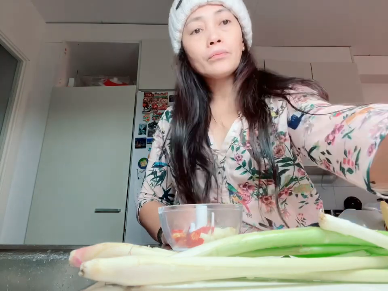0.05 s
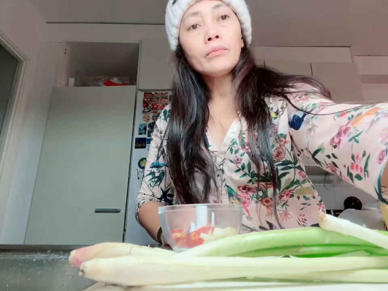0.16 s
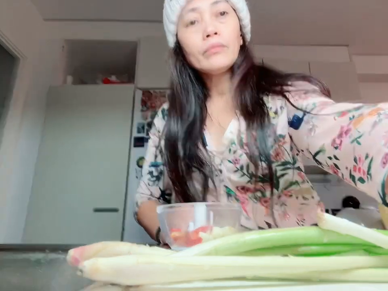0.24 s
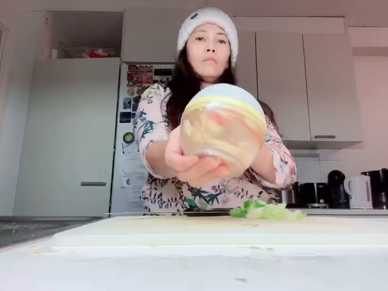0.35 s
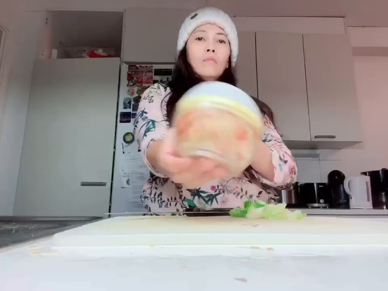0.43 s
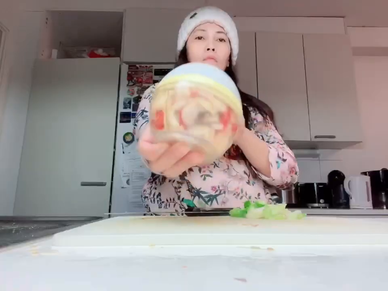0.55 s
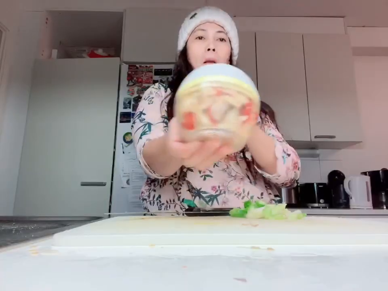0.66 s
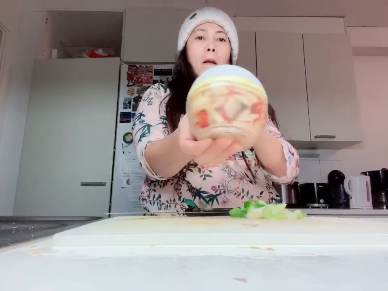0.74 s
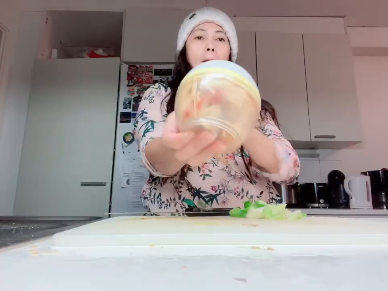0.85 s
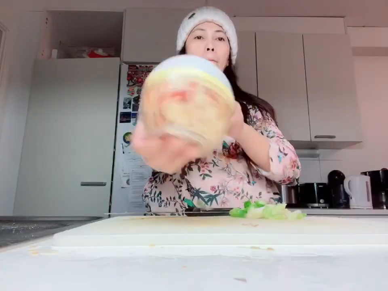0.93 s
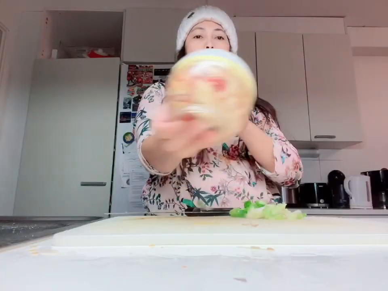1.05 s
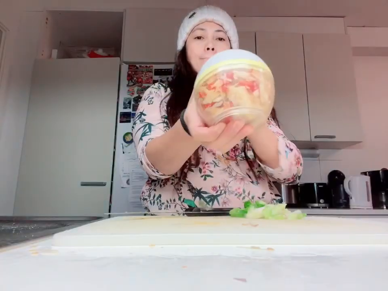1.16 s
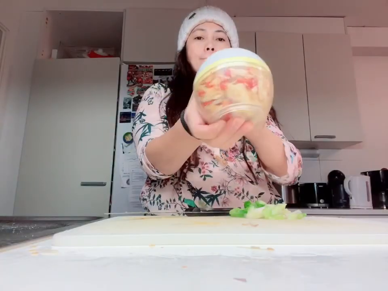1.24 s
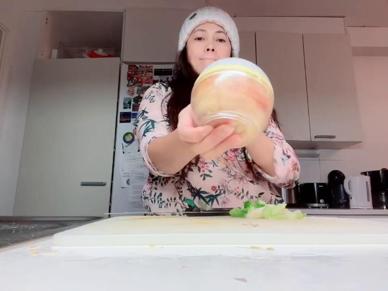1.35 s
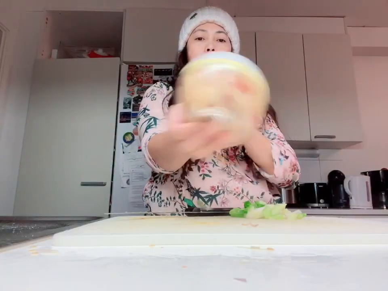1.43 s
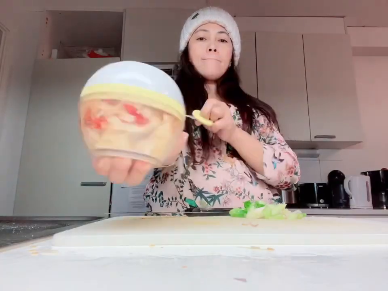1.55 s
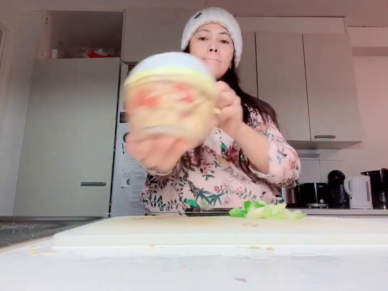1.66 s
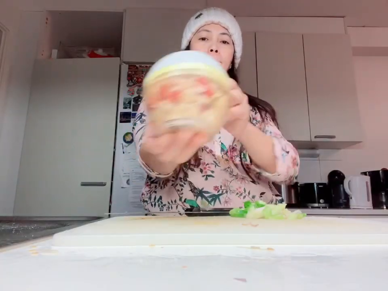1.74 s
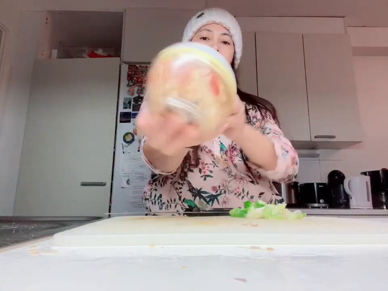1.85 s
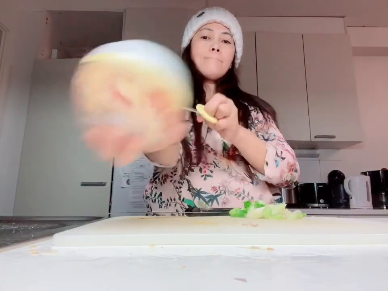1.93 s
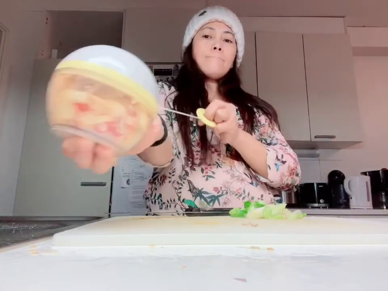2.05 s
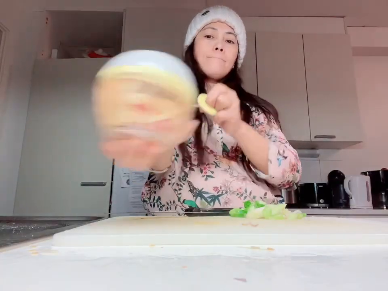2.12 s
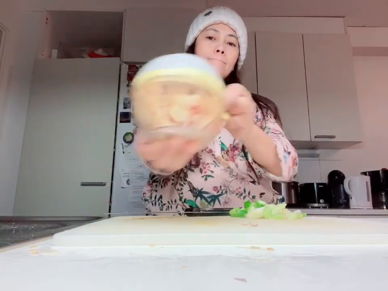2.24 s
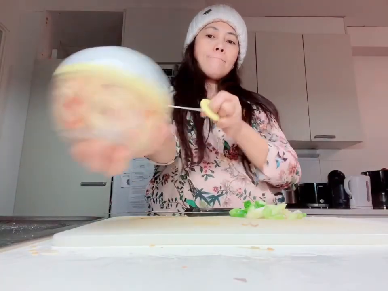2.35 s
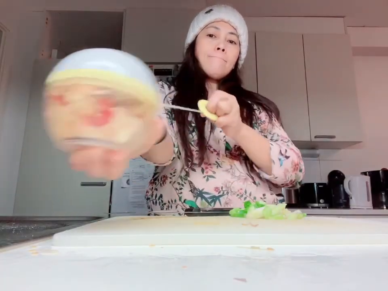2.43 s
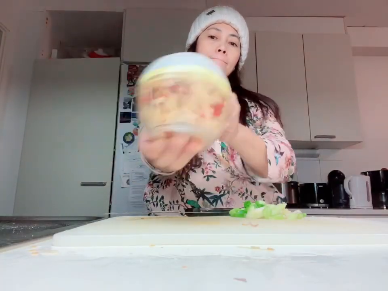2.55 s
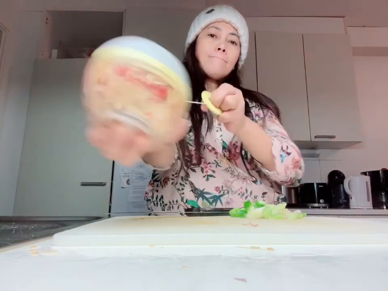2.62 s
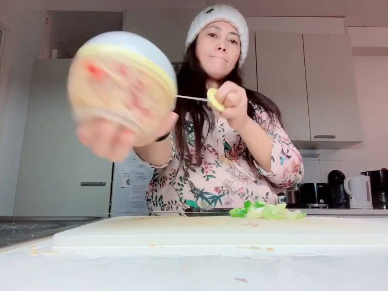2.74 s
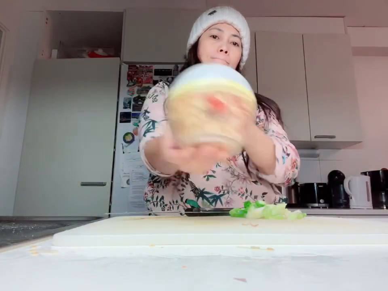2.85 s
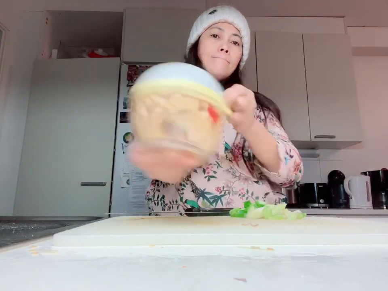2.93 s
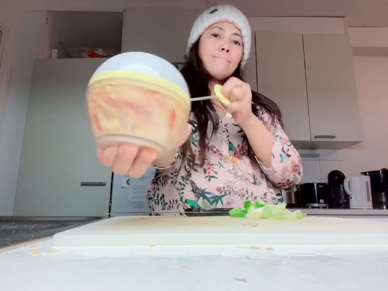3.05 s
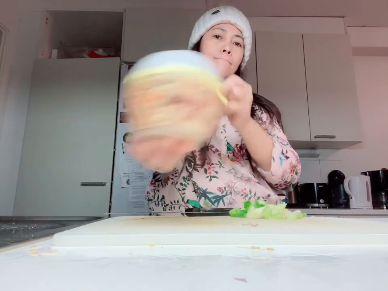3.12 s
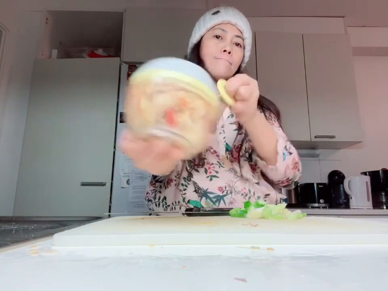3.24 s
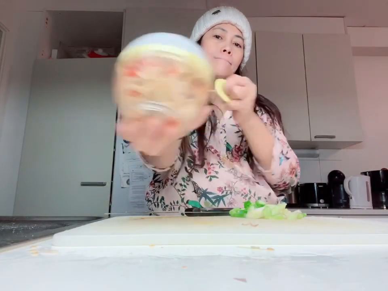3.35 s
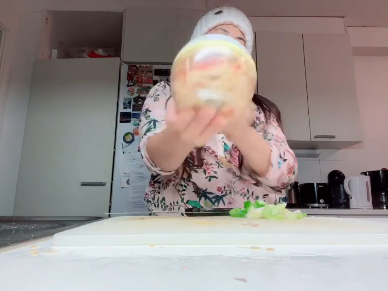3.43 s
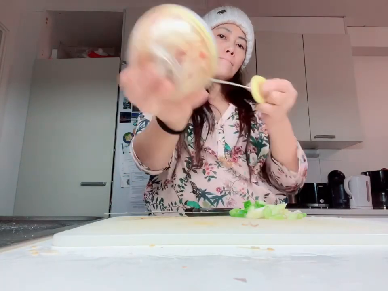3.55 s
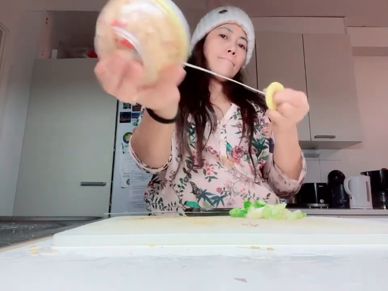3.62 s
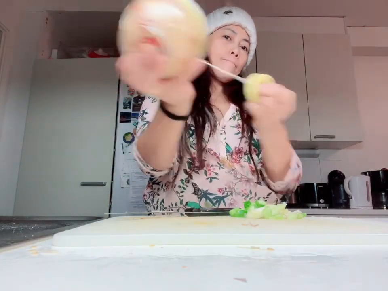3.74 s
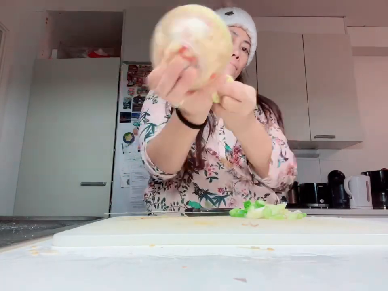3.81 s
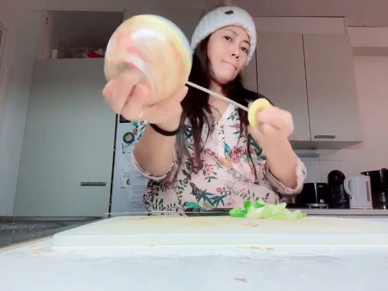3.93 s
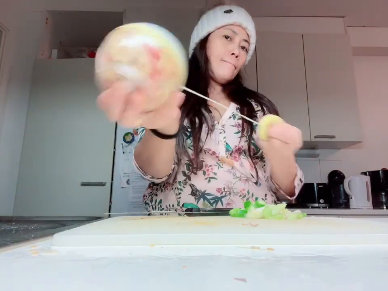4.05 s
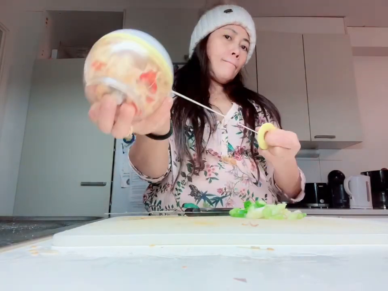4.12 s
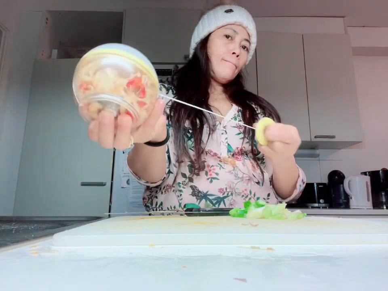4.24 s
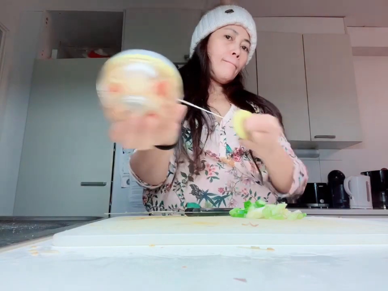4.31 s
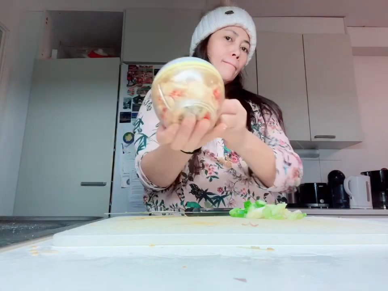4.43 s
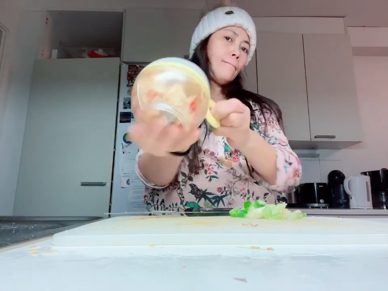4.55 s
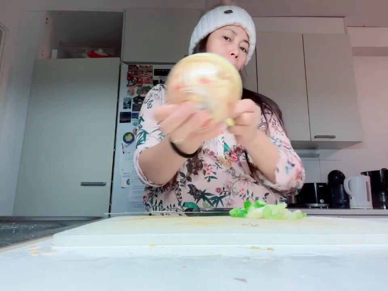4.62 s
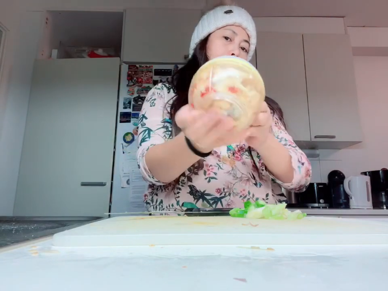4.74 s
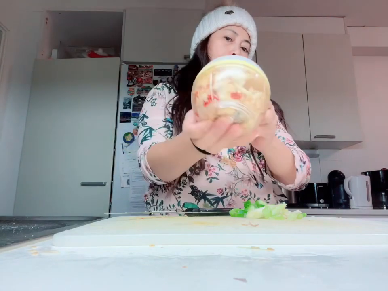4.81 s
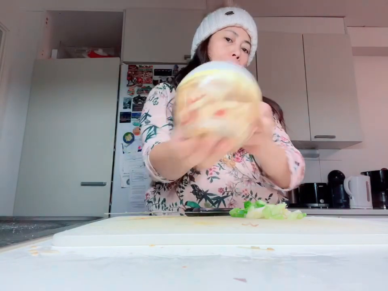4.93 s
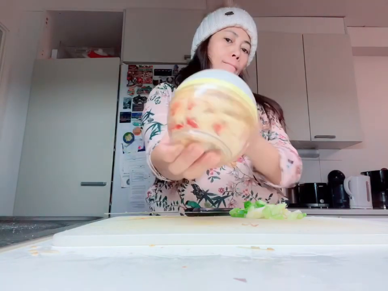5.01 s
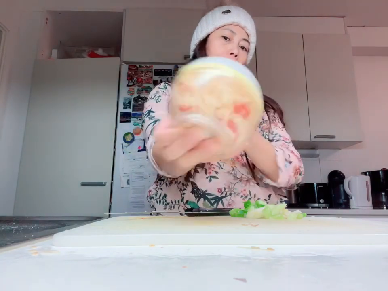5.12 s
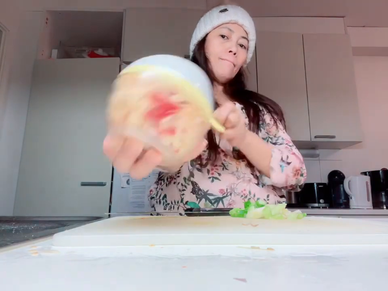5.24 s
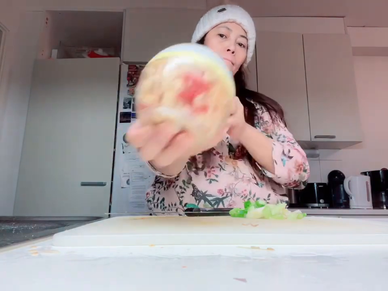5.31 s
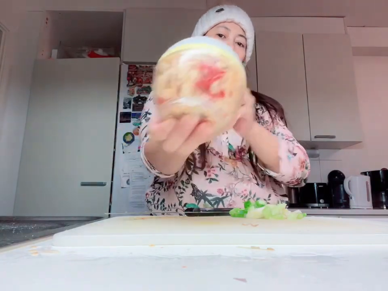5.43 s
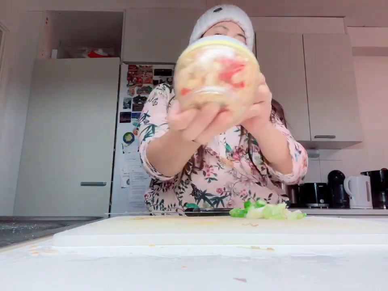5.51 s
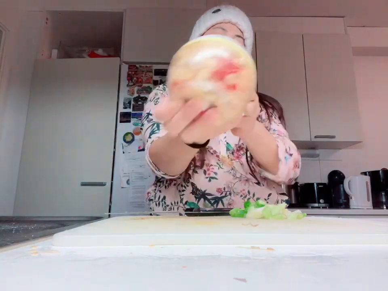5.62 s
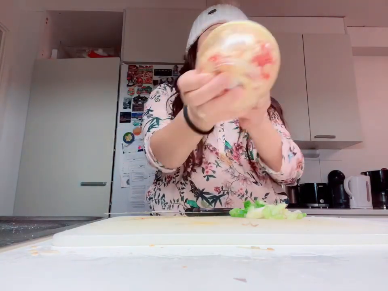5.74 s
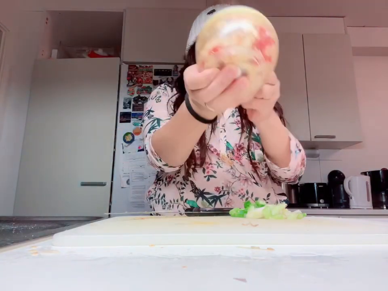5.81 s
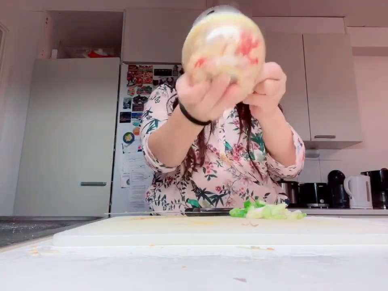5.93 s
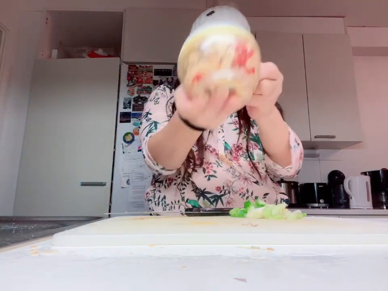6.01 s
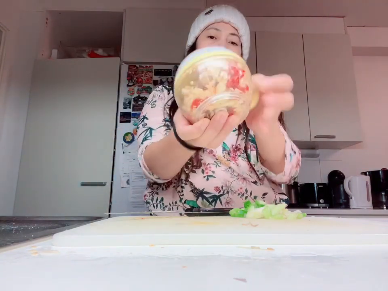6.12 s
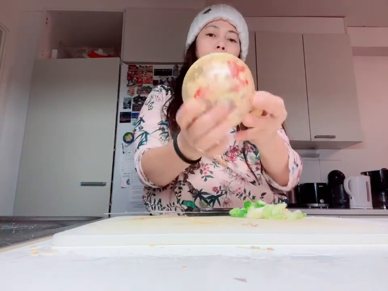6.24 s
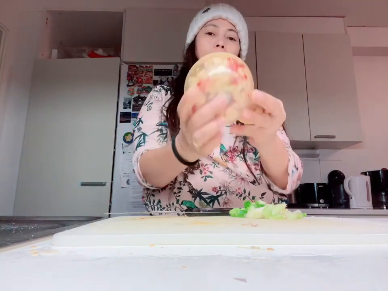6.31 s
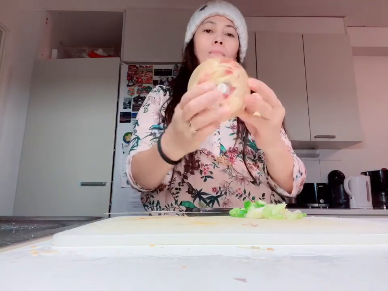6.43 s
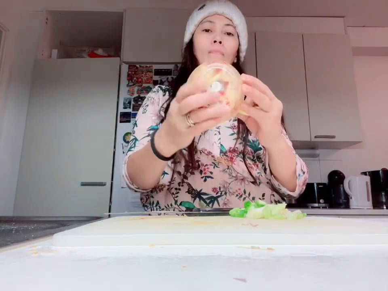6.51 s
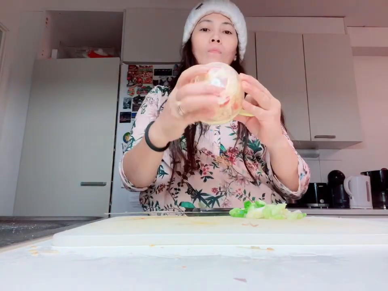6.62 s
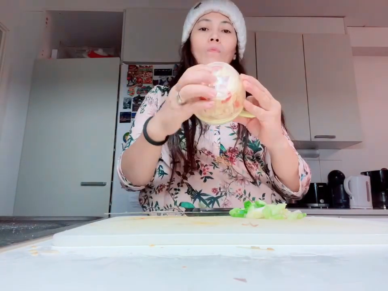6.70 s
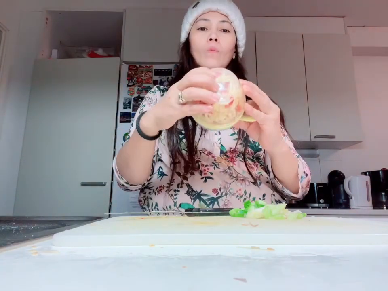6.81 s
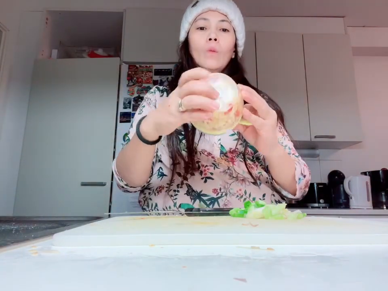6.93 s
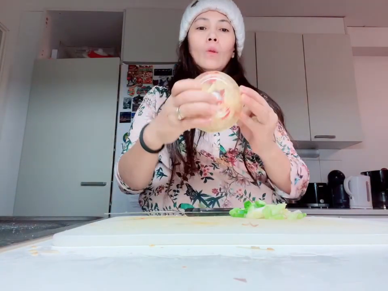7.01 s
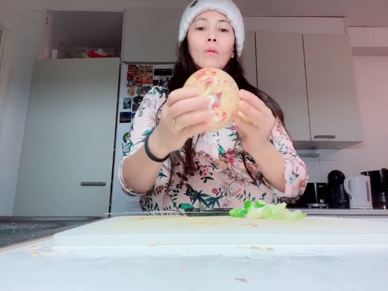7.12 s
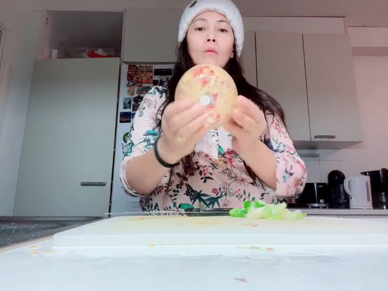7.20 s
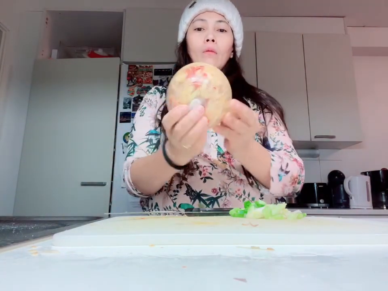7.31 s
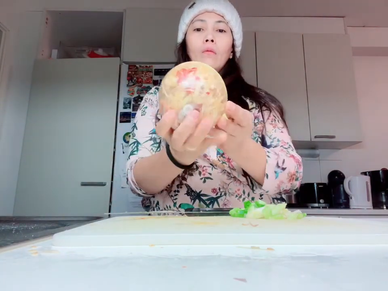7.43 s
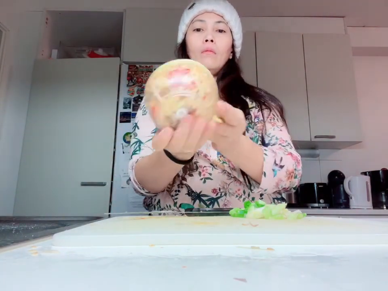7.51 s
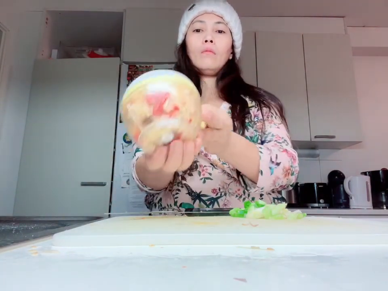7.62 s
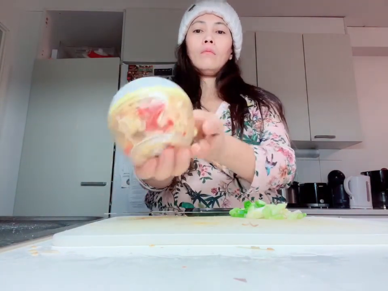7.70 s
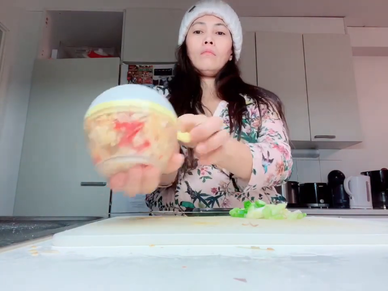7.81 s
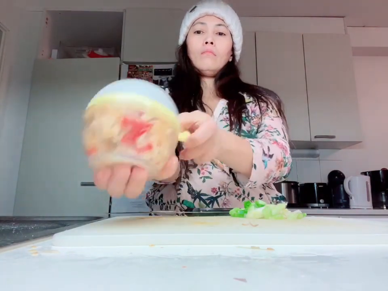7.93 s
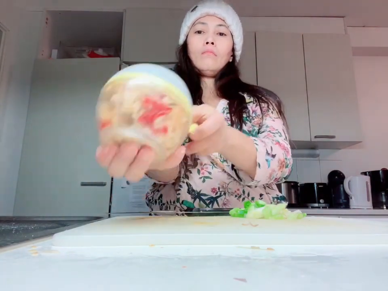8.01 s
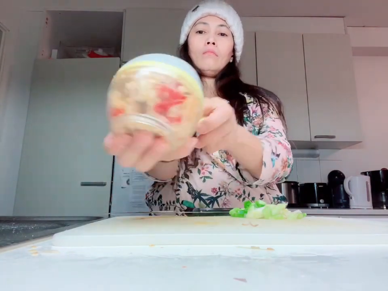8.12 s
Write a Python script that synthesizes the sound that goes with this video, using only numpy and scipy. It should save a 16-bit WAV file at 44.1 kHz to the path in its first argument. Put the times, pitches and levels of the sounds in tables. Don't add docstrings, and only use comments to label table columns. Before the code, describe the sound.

A hand chopper with a pull cord rattles hard and dry, close up, with short reflections from kitchen cupboards. Each pull gives a crunchy hail of pieces against plastic, then a bright zipping rewind and sharp clack. The rhythm quickens, pauses briefly near four and a half seconds, bursts again, then ceases. Quiet ratchet ticks and finger taps follow, with soft room noise and low hum.

```python
import sys
import numpy as np
from scipy import signal
from scipy.fft import rfft, irfft
from scipy.io import wavfile

SR = 44100
rng = np.random.default_rng(int(sys.argv[2]) if len(sys.argv) > 2 else 0)


def inscribe(sig):
    pcm = np.round(np.clip(np.atleast_2d(sig).T, -1, 1) * 32767)
    wavfile.write(sys.argv[1], SR, pcm.astype(np.int16))


def volts_from_db(level):
    exponent = np.asarray(level, float) / 20
    return 10 ** exponent


N = 359856

# freq_hz, density_db
AIR_SPECTRUM = [(40, -30), (120, -20), (250, -20), (500, -23), (800, -26), (1100, -33), (2200, -37),
                (2800, -35), (3600, -42.5), (4700, -46), (5500, -44), (8000, -47), (15500, -55.5)]
# freq_hz, rms_db
MOTOR_LINES = [(49, -66), (100, -51), (184, -70.5)]
# freq_hz, rms_db
PUMP_LINES = [(2175, -83), (2573, -76), (2622, -77), (2772, -85), (2918, -82), (2966, -81), (3117, -85),
              (4204, -92), (6035, -89.5)]
# time_s, gain_db
HUM_GAIN = [
    (.33, 0.5),
    (.4, -14),
    (.75, -10),
    (1.0, -4.5),
    (5.9, -0.5),
]
# start_s, end_s
GAP_S = (.3335, .3555)
# time_s, peak_db
JOLTS = [(0, -45), (.32, -41), (.79, -53), (1.42, -36), (1.82, -38), (2.2, -42), (2.6, -41), (2.9, -38),
         (2.42, -42.5), (3.2, -40.5), (3.45, -51), (3.87, -46), (5.07, -33), (4.75, -49), (5.55, -38.5),
         (5.87, -46), (6.09, -43)]
# freq_hz, width_hz, gain_db
THUD_MODES = [(134, 110, -3.5), (192, 95, 0.5), (269, 63, 4.5), (320, 100, -1.5)]
# freq_hz, width_hz, gain_db
BELLY_MODES = [(442, 110, -4.5), (608, 139, -0.5), (729, 161, 1.5), (869, 109.5, 2), (1221, 110, -14)]
# freq_hz, width_hz, gain_db
WALL_MODES = [(1420, 590, -4), (1768, 190, -2.5), (1976, 110, 0.5), (2480, 710, -4.5), (3040, 69, -1.5),
              (3380, 690, -11)]
# freq_hz, width_hz, gain_db
RIM_MODES = [(4330, 2600, -8.5), (6264, 900, -1.5), (6840, 1000, -4.5), (9200, 2100, -5.5),
             (11300, 5000, -10.5), (14050, 2800, -10), (14700, 820, -9)]
# freq_hz, width_hz, gain_db
LID_MODES = [(500, 700, -12.5), (883, 81, -5.5), (1720, 320, -20), (2050, 130, 0.5), (2206, 180, 1.5),
             (2600, 200, -7), (2890, 88, -8), (3490, 3200, -15.5)]
# freq_hz, width_hz, gain_db
SPRING_MODES = [(5310, 380, -2), (6650, 1900, -12), (8170, 430, 0.5), (9100, 1900, -7), (9600, 270, -0.5),
                (11940, 1000, -10.5), (13000, 600, -20), (15300, 1300, -12)]
# start_s, peak_db, rise_s, length_s, entry_rel_db
REWINDS = [(.549, -35, 0.048, 0.15, -5.5), (1, -33, 0.051, 0.15, -5.5), (1.524, -25.5, 0.066, 0.18, -8),
           (1.988, -24.5, 0.046, 0.14, -4.5), (2.354, -23.5, 0.037, 0.13, -8),
           (2.681, -20.5, 0.048, 0.11, -10.5), (2.979, -18, 0.044, 0.1, -8.5),
           (3.262, -21.5, 0.0492, 0.11, -15.5), (3.634, -24, 0.045, 0.13, -8),
           (4.204, -28, 0.061, 0.23, -9.5), (5.315, -27, 0.021, 0.19, -5.5)]
# time_s, peak_db, brightness_db
TICKS = [(0.526, -32, -6), (.985, -30, -10), (1.256, -34, 10), (6.18, -51.5, -2.5), (7.57, -49, -6),
         (3.9504, -21, -0.5), (3.966, -11.5, -8), (4.1715, -28, -6.5), (4.1936, -26.5, -12),
         (4.797, -20.5, -12), (5.2884, -21, -26.5), (5.9518, -46, -3.5), (6.391, -34.5, -2.5),
         (6.409, -35.5, -6), (6.4294, -45, -7), (7.024, -35.5, -4), (7.0397, -52.5, -8.5),
         (7.1403, -40.5, -12.5), (7.234, -51.5, -4), (8.143, -22.5, -4), (1.559, -14, -8.5),
         (1.582, -18, -10), (2.408, -10, -8), (2.447, -15, -8), (2.694, -16, -9), (3.006, -7, -10),
         (3.031, -6.5, -8), (3.31, -7.5, -8), (3.68, -17, -6), (4.246, -23, -1), (4.268, -26, -4),
         (5.33, -18, -13), (5.462, -32, -10), (5.476, -28, -3)]
# time_s, peak_db, pitch_hz
RINGS = [(.784, -17.5, 2140), (.806, -11.5, 2600), (1.378, -14, 1350), (1.42, -17, 1900),
         (2.218, -13.5, 4500), (2.266, -14.5, 4100), (2.269, -14, 2900), (2.516, -17, 2490),
         (2.824, -16, 1830), (2.846, -10, 1640), (2.847, -8.5, 4570), (3.116, -10.5, 3002),
         (3.133, -11, 2000), (3.161, -11, 2099), (3.381, -5, 1950), (3.497, -18, 1160), (4.439, -11, 1675),
         (4.44, -16, 2501), (4.881, -15, 2010), (5.055, -12.5, 3600), (5.068, -17, 4800),
         (5.093, -2.5, 2050), (5.106, -12, 3150), (5.263, -28, 2761), (5.487, -17, 2199),
         (5.696, -36, 2150), (5.75, -27, 2360), (5.63, -31, 840.3), (5.768, -21.5, 258),
         (5.77, -28.5, 599.7), (6.285, -39, 2190), (7.705, -34.5, 4000), (7.784, -34.5, 2700),
         (7.82, -34, 2550), (7.843, -28.5, 2320), (7.963, -25.5, 2570), (7.885, -35, 347),
         (8.029, -32, 504), (8.054, -34, 450), (8.068, -26.5, 2310), (8.079, -25, 448), (3.951, -22, 5540),
         (3.962, -20.5, 5400), (2.796, -8, 878), (7.753, -23, 740), (7.843, -25.5, 750), (7.963, -23, 864),
         (8.147, -28, 5305), (5.057, -9, 803), (5.071, -9, 700), (1.838, -16, 4000), (4.66, -31, 302),
         (4.8, -32, 3300), (0.289, -18.5, 1480), (.253, -28.5, 1600), (7.025, -46, 2300),
         (6.392, -44, 2350)]
# time_s, peak_db, brightness_db
STOPS = [(.7, -11.5, -5.5), (1.165, -16.5, -3.5), (1.706, -10, -3.5), (2.128, -5, -6.5), (2.478, -6, -4.5),
         (2.795, -0.7, -5.5), (3.083, -5.5, -6), (3.377, 0.5, -8.5), (3.808, -20, 2), (4.438, -7.5, -3),
         (5.491, -5.5, -10)]
# time_s, peak_db, thud_rel_db, brightness_db
TAPS = [(.25, -20, -9, -19), (.286, -6, -11, -23), (0.327, 0.5, -13.5, -24), (.502, -29.5, -18, -10),
        (.968, -30, -15, -3.5), (4.537, -25, -13, -17), (4.657, -22, -9, -10), (5.261, -23, -17, -11),
        (5.694, -24.5, -7.5, -7), (5.749, -14, -8.5, -14.5), (5.878, -35, -23, 1), (6.283, -20, -28, -19.5),
        (6.559, -37.5, -2.5, -20), (7.377, -25, -22.5, -4.5), (7.6, -31.5, -22, -13.5),
        (7.703, -22, -24, -5.5), (7.751, -16.5, -25.5, -9.5), (7.775, -21.5, -32, -5),
        (7.798, -28, -31, -2.5), (7.817, -21.5, -25, -14), (7.842, -21, -35, -10.5),
        (7.88, -19.5, -19, -9.5), (7.961, -11, -16, -9), (8.004, -25, -8, -5), (8.038, -23.5, -27, -9),
        (8.065, -33, -22, 0.5), (8.077, -19.5, -17, -19), (8.144, -23, -34, -9)]
# time_s, peak_db, brightness_db
CHOPS = [(.804, -3, -11), (.91, -18, -15.5), (1.194, -17.5, -12.5), (1.234, -15.5, -5), (1.279, -26, 2),
         (1.331, -4.5, -21), (1.494, -25.5, -2), (1.784, 1, -11), (1.849, -2, -15), (1.963, -24, -3),
         (2.218, 2.5, -12), (2.334, -16, -7), (2.517, -5.5, -13), (2.545, -6, -0.5), (2.822, -6, -13),
         (2.847, -14.5, -16), (3.112, -8.5, 0), (3.611, -36, 7.5), (4.075, -28.5, -2.5), (4.137, -25, -11),
         (4.743, -22.5, -9), (4.76, -22.5, -9), (4.872, -11, -20), (4.88, -5.5, -1.5), (4.95, -15, -6.5),
         (4.984, -19, -1), (5.054, 0, -10.5), (5.071, -1, -27), (5.092, -15, 4), (5.485, -15, -17),
         (.782, -8.5, -21), (1.347, -7, -12.5), (1.361, -4.5, -17), (1.379, -7, -8), (1.42, -10.5, -3.5),
         (1.748, -17, -2), (1.792, -7, -9.5), (3.43, -12, -5), (3.77, -21, -13), (3.865, -9.5, -10),
         (4.78, -27.5, -2.5), (4.828, -28, -4), (2.165, -11, -8), (2.19, -11, -9), (2.266, -2.5, -8),
         (2.836, -3.5, -12), (2.864, -6.5, -7.5), (3.132, -5, -8.5), (3.161, -8, -5.5), (3.497, -10.5, -8),
         (5.086, -1.5, -15.5), (5.106, -5, -10), (5.135, -14.5, -4.5)]
# start_s, peak_s, end_s, peak_db, brightness_db
SHIFTS = [(0.07, 0.088, 0.13, -52, -12), (0.113, 0.133, 0.21, -47.5, -13), (0.222, 0.247, 0.29, -28, -26),
          (0.273, 0.288, 0.336, -19.5, -25), (0.312, 0.327, 0.354, -19, -27),
          (4.638, 4.672, 4.8, -35.5, -12.5), (5.621, 5.627, 5.69, -41, -9),
          (5.698, 5.765, 5.93, -41.5, -6.5), (5.79, 5.846, 6.1, -51.5, -7), (3.148, 3.205, 3.34, -42, -17),
          (5.529, 5.547, 4.73, -39, 0), (5.98, 6.035, 6.31, -53, -6), (6.098, 6.138, 6.3, -52, -4.5),
          (7.755, 7.764, 8.0, -52.5, 5), (7.967, 8.08, 8.2, -51.5, 1), (8.117, 8.14, 8.2, -49.5, 0)]
# start_s, peak_s, end_s, peak_db, entry_rel_db
SURGES = [(0.354, 0.39, 0.58, -36, -1.5), (0.728, 0.78, 0.95, -24, -20.5), (1.217, 1.31, 1.6, -29, -7.5),
          (1.333, 1.365, 1.493, -15.5, -6), (1.477, 1.54, 2.2, -43.5, 4), (1.722, 1.827, 1.965, -16.5, -17),
          (1.91, 1.958, 2.4, -40, -2), (2.143, 2.243, 2.354, -20, -3), (2.495, 2.545, 2.733, -18.5, -9),
          (2.809, 2.845, 3.04, -15, -13), (3.092, 3.154, 3.223, -16, -12), (3.392, 3.475, 3.655, -28, 4),
          (3.58, 3.1, 4.8, -46, -13), (3.758, 3.856, 4.03, -23, -21.5), (3.918, 3.96, 4.053, -23, -7.5),
          (4.06, 4.4, 4.3, -48.5, -1.5), (4.448, 4.441, 4.612, -32, 16), (4.743, 4.798, 4.94, -40, -9),
          (4.894, 5.01, 4.95, -33.5, 0), (4.92, 5.17, 5.06, -29.5, -7.5), (5.02, 5.03, 5.2, -18, -15),
          (5.077, 4.83, 5.05, -15.5, -10), (5.112, 5.1, 5.03, -28, -1), (5.16, 5.3, 5.97, -46.5, 8),
          (5.5, 5.57, 5.66, -35.5, -3), (1.171, 1.13, 1.2, -42.5, 2), (3.171, 3.21, 3.5, -45, 1),
          (2.881, 2.911, 3.01, -23.5, -3), (4.815, 4.828, 4.8, -44.5, -2)]


def cut(x, hz, kind):
    return signal.sosfilt(signal.butter(2, hz, kind, fs=SR, output="sos"), x)


def drift(rate_hz):
    r = np.exp(-64 * np.pi * rate_hz / SR)
    draws = rng.standard_normal(N // 32 + 1002)
    slow = signal.lfilter([1], [1, -2 * r, r * r], draws)[1000:]
    return np.interp(np.arange(N) / 32, np.arange(len(slow)), slow / slow.std())


def grains(per_s, spread_db, smooth):
    sizes = volts_from_db(spread_db * np.minimum(rng.exponential(1, N), 4)) * rng.choice([-1, 1], N)
    clicks = sizes * (rng.random(N) < per_s / SR)
    friction = rng.standard_normal(N)
    return np.sqrt(1 - smooth) * clicks / clicks.std() + np.sqrt(smooth) * friction


def resonate(x, modes, wander_db=0, wander_hz=6.3):
    out, pulse = 0, 0
    for k, (hz, width_hz, db) in enumerate(modes):
        r = np.exp(-np.pi * width_hz / SR)
        top = (-1) ** k * volts_from_db(db) * (1 - r * r) / 2
        b = [top, 0, -top]
        a = [1, -2 * r * np.cos(2 * np.pi * hz / SR), r * r]
        out = out + signal.lfilter(b, a, x + 1e-18) * volts_from_db(wander_db * drift(wander_hz))
        pulse = pulse + signal.lfilter(b, a, signal.unit_impulse(4096))
    return out / np.sqrt(np.sum(pulse ** 2))


def swells(start_s, peak_s, end_s, peak_db, entry_db, fall_db, rounding):
    out, edge_s = np.full(N, -110.), .005
    for a, b, c, top_db, in_db in np.broadcast(start_s, peak_s, end_s, peak_db, entry_db):
        b = max(b, a + .001)
        c = max(c, b + .001)
        i = np.arange(int((a - edge_s) * SR), min(int((c + edge_s) * SR), N))
        t = i / SR
        shape_db = np.interp(t, [a - edge_s, a, b, c, c + edge_s], [-50, in_db, 0, 0, -30])
        shape_db = shape_db + fall_db * np.clip((t - b) / (c - b), 0, 1) ** rounding
        out[i] = np.maximum(out[i], top_db + shape_db)
    return out


def rattles(time_s, peak_db, fade_s):
    t = np.arange(SR // 10) / SR
    blows = np.zeros(N)
    blows[np.round((time_s - .0012) * SR).astype(int)] = volts_from_db(peak_db)
    return signal.oaconvolve(blows, (1 - np.exp(-t / 0.0018)) * np.exp(-t / fade_s))[:N]


def air():
    hz = np.maximum(np.fft.rfftfreq(N, 1 / SR), 1)
    node_hz, node_db = np.transpose(AIR_SPECTRUM)
    shape = volts_from_db(np.interp(np.log(hz), np.log(node_hz), node_db))
    noise = irfft(rfft(rng.standard_normal(N)) * shape, N)
    return volts_from_db(-57.5) * noise / noise.std()


def tones(lines):
    t = np.arange(N) / SR
    return sum(np.sqrt(2) * volts_from_db(db) * np.sin(2 * np.pi * (hz * t + rng.random())) for hz, db in lines)


def refrigerator():
    gain = volts_from_db(np.interp(np.arange(N) / SR, *np.transpose(HUM_GAIN)))
    hum, whine = tones(MOTOR_LINES), tones(PUMP_LINES)
    return gain * (volts_from_db(1.5 * drift(5)) * hum + volts_from_db(.7 * drift(3)) * whine)


def kitchen(x):
    t60_s, level_db, wall_cut_hz = 0.21, -13.5, 12000
    t = np.arange(SR // 2) / SR
    low, high = rng.standard_normal((2, len(t))) * (t > .004)
    low = signal.lfilter(*signal.butter(1, wall_cut_hz, fs=SR), low)
    tail = low * volts_from_db(-60 * t / t60_s) + .5 * high * volts_from_db(-110 * t / t60_s)
    return x + volts_from_db(level_db) * signal.oaconvolve(x, tail / np.sqrt(np.sum(tail ** 2)))[:N]


def counter():
    rise_db_per_s, fall_db_per_s, floor_db = 158.5, 149.5, -63
    t = np.arange(0, N / SR + 1, .005)
    jolts = [db - np.maximum(rise_db_per_s * (s - t), fall_db_per_s * (t - s)) for s, db in JOLTS]
    level_db = np.maximum(np.max(jolts, axis=0), floor_db)
    rumble = cut(rng.standard_normal(N), [42, 90], "band")
    return volts_from_db(np.interp(np.arange(N) / SR, t, level_db)) * rumble / rumble.std()


def glide(x, start_s, length_s):
    depth = .015
    t = np.arange(N) / SR
    lag_s = 0
    for s, n in zip(start_s, length_s):
        lag_s = lag_s + depth * n / (2 * np.pi) * np.sin(2 * np.pi * np.clip((t - s) / n, 0, 1))
    return np.interp(t - lag_s, t, x)


def rewind():
    fall_db, rounding, bright_db = -17, 1.57, 2
    steeper = 1.092
    start_s, peak_db, rise_s, length_s, entry_db = np.transpose(REWINDS)
    run = start_s, start_s + rise_s, start_s + length_s
    spring_db = swells(*run, peak_db + bright_db, steeper * entry_db, steeper * fall_db, rounding)
    lid_db = swells(*run, peak_db, entry_db, fall_db, rounding)
    tick_s, tick_db, tick_bright_db = np.transpose(TICKS)
    lid_level = volts_from_db(lid_db) + rattles(tick_s, tick_db - 7.5, 0.004)
    spring_level = volts_from_db(spring_db) + rattles(tick_s, tick_db + tick_bright_db - 5.5, 0.0063)
    slips = grains(2500, 2.8, .45) * volts_from_db(1.4 * drift(90))
    lid = resonate(slips * lid_level, LID_MODES, wander_db=2.3, wander_hz=15.0)
    lid = glide(cut(lid, 4200, "low"), start_s, length_s)
    spring = resonate(slips * spring_level, SPRING_MODES)
    spring = spring - .45 * cut(spring, [13200, 14600], "band")
    return lid + cut(spring, 12500, "low") - volts_from_db(-5.5) * cut(spring, 18000, "high")


def rings():
    fade_s, ring_cycles = .005, 6.7
    out, t = np.zeros(N + SR), np.arange(SR // 20) / SR
    for (s, db, hz), noise in zip(RINGS, rng.standard_normal((len(RINGS), len(t)))):
        r = np.exp(-hz / ring_cycles * 2 / SR)
        w = 2 * np.pi * hz / SR
        blow = (noise + 3.7 * (t == 0)) * np.exp(-t / fade_s)
        note = signal.lfilter([1, 0, -1], [1, -2 * r * np.cos(w), r * r], blow)
        note = cut(note, 2.3 * hz, "low")
        i = int((s - .001) * SR)
        out[i:i + len(t)] += volts_from_db(db) * note / np.abs(note).max()
    return out[:N]


def knocks():
    # time_s, peak_db, thud_db, wall_db, rim_db
    stops = [(s, db, -29, bright, bright - 5) for s, db, bright in STOPS]
    chops = [(s, db, -25, bright, bright - 10.5) for s, db, bright in CHOPS]
    taps = [(s, db, thud, bright, bright - 14) for s, db, thud, bright in TAPS]
    s, peak_db, thud_db, wall_db, rim_db = np.transpose(stops + chops + taps)
    contact = grains(3000, 1.2, 0.62)
    contact[np.round((s + .0012) * SR).astype(int)] = 24.0
    thud = rattles(s, peak_db + thud_db + 4, 0.0035) * contact
    belly = rattles(s, peak_db - 8, .0028) * contact
    wall = rattles(s, peak_db + wall_db - 10.0, 0.0094) * contact
    rim = rattles(s, peak_db + rim_db - 0.5, 0.0076) * grains(5000, 2.2, .7)
    return [thud, belly, wall, rim]


def surges():
    mean_db, fall_db, rounding = -26, -31.5, 1.4
    level_db = swells(*np.transpose(SURGES), fall_db, rounding)
    over_db = level_db - mean_db
    thud = volts_from_db(mean_db - 7.5 + .9 * over_db)
    rim = volts_from_db(mean_db - 7.5 + 0.99 * over_db)
    return thud, volts_from_db(level_db), volts_from_db(level_db - 2), rim


def shifts():
    entry_db, fall_db, rounding = -13.5, -31, 1.4
    mean_db, thud_db, rim_db = -38.5, 4, -15.5
    start_s, peak_s, end_s, db, bright_db = np.transpose(SHIFTS)

    def level(top_db):
        return volts_from_db(swells(start_s, peak_s, end_s, top_db, entry_db, fall_db, rounding))

    thud = volts_from_db(thud_db) * level(mean_db + 0.92 * (db - mean_db))
    crisp = level(db + bright_db)
    return thud, level(db), crisp, volts_from_db(rim_db) * crisp


def pieces():
    thud, belly, wall, rim = [a + b for a, b in zip(surges(), shifts())]
    lumps = drift(42)
    lumpy = volts_from_db(2.2 * lumps - 2.5)
    heavy, light = grains(500, 3.4, 0.25), grains(2000, 1.8, 0.2)
    cracks = grains(130, 3.0, 0)
    mixed = .5 * heavy + 0.69 * light + 0.33 * cracks
    chips = light + 0.17 * cracks
    return [heavy * lumpy * thud, heavy * lumpy * belly, mixed * lumpy * wall, chips * volts_from_db(lumps) * rim]


def bowl():
    ranges = THUD_MODES, BELLY_MODES, WALL_MODES, RIM_MODES
    wanders_db = 2.0, 2.08, 2.5, 0
    thud, belly, wall, rim = [resonate(a + b, modes, wander_db) for a, b, modes, wander_db
                              in zip(pieces(), knocks(), ranges, wanders_db)]
    return cut(thud, 500, "low") + cut(belly, 1600, "low") + cut(wall, 5000, "low") + rim


def scene():
    t = np.arange(N) / SR
    chopper = bowl() + rewind() + rings()
    gap_start_s, gap_end_s = GAP_S
    before = t < gap_start_s
    sound = kitchen(chopper * before) * before + kitchen(chopper * ~before)
    sound = sound + refrigerator() + air() + counter()
    fade = np.interp(t, [gap_start_s - .0012, gap_start_s, gap_end_s, gap_end_s + 0.0012], [1, 0, 0, 1])
    return (sound * np.maximum(fade, volts_from_db(-70)))[None]


def low_pass(x):
    return signal.sosfilt(signal.butter(12, 16970, fs=SR, output="sos"), x)


def record(dry):
    rounded = 1.1 * np.tanh(dry / 1.1)
    mix = signal.sosfilt(signal.ellip(10, .3, 45, 15780, fs=SR, output="sos"), rounded)
    return low_pass(mix)


dry = scene()
out = record(dry)
inscribe(out)
```